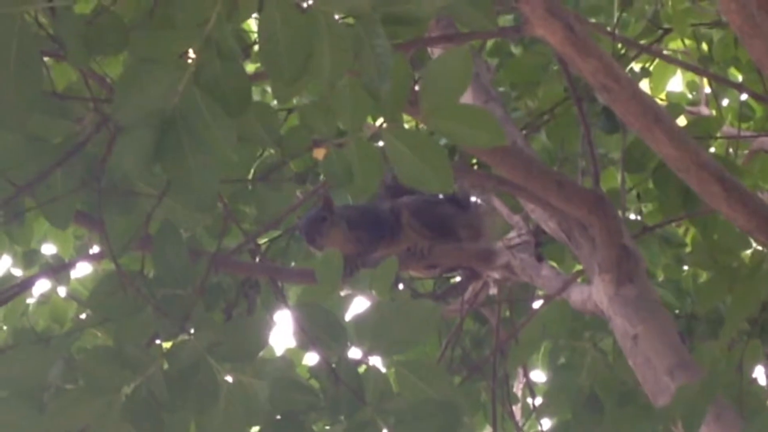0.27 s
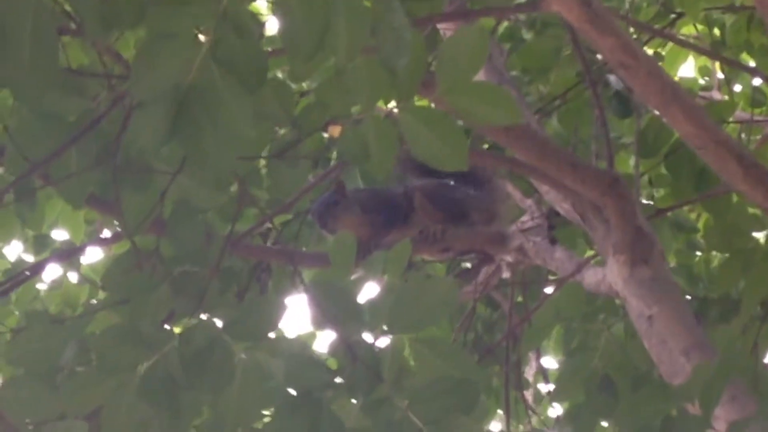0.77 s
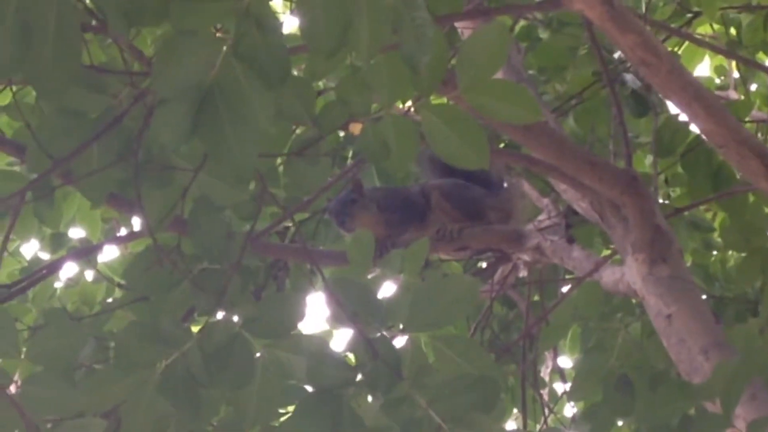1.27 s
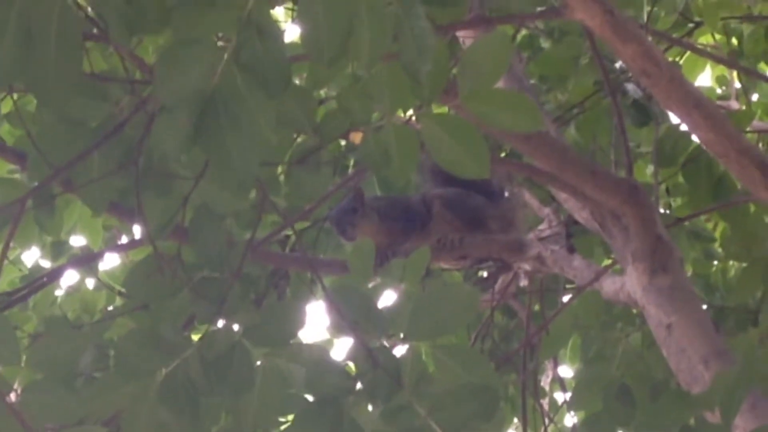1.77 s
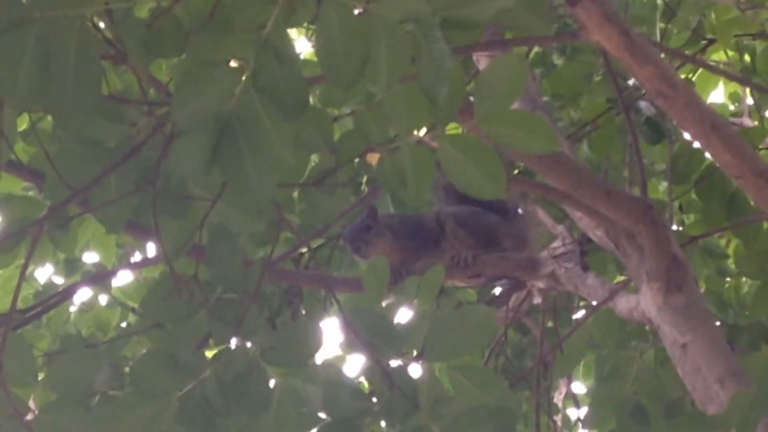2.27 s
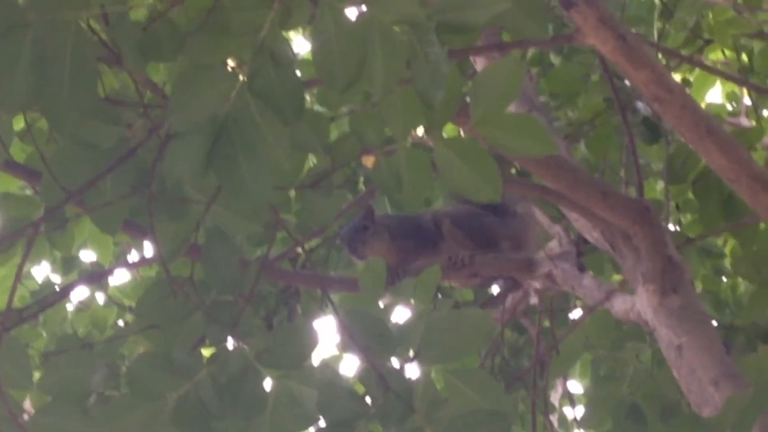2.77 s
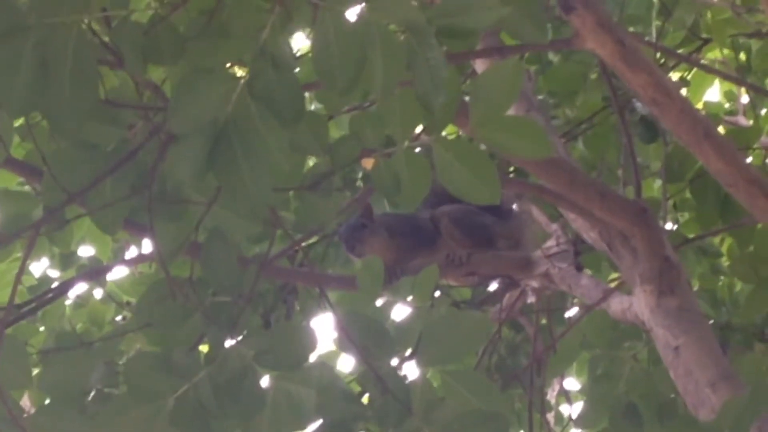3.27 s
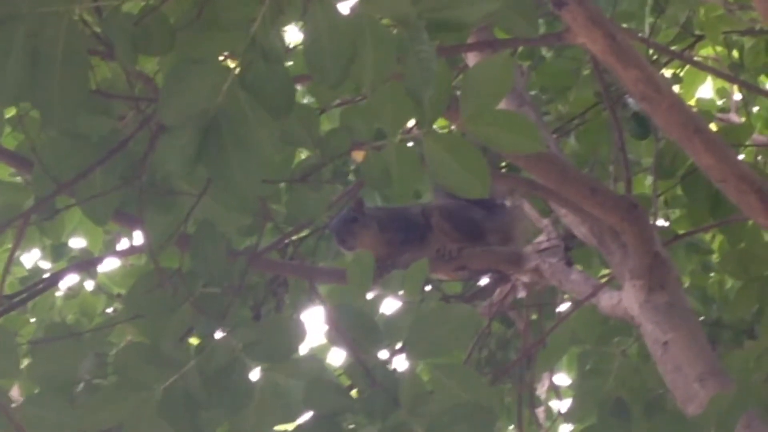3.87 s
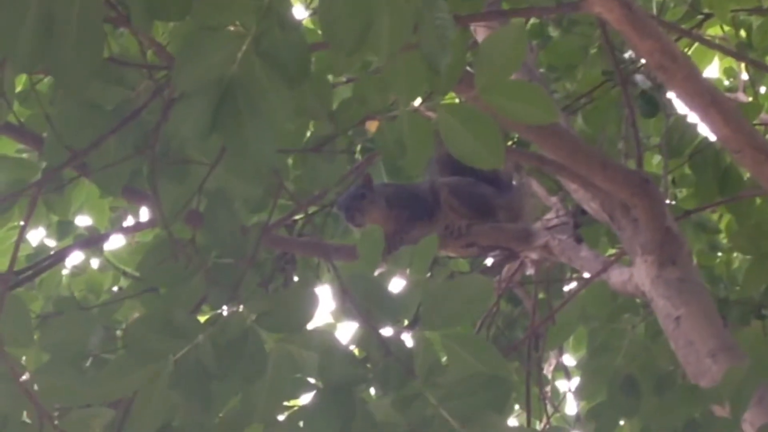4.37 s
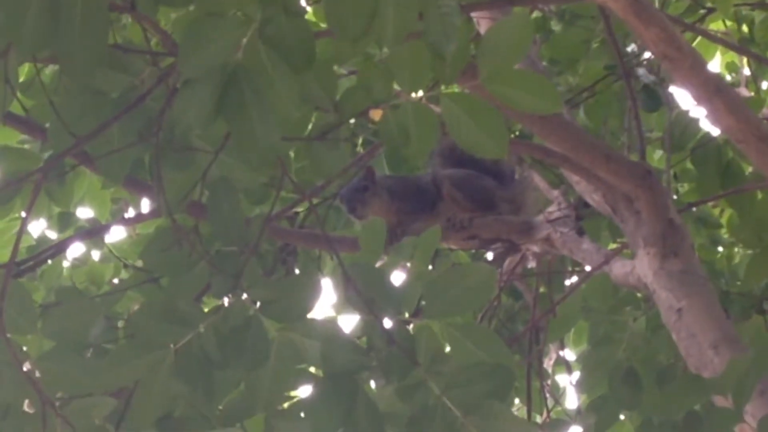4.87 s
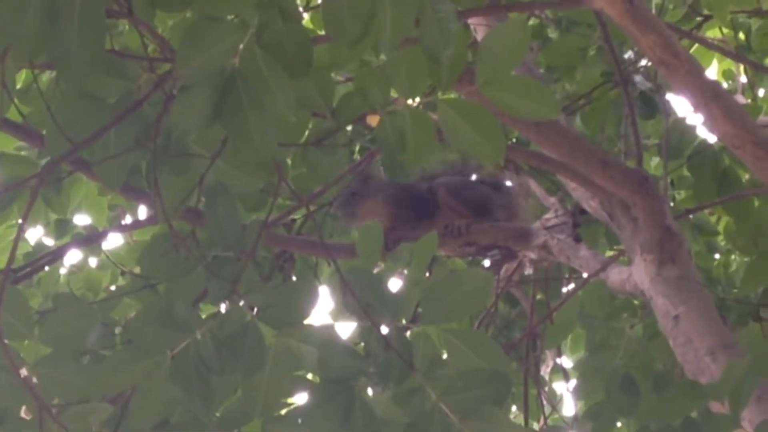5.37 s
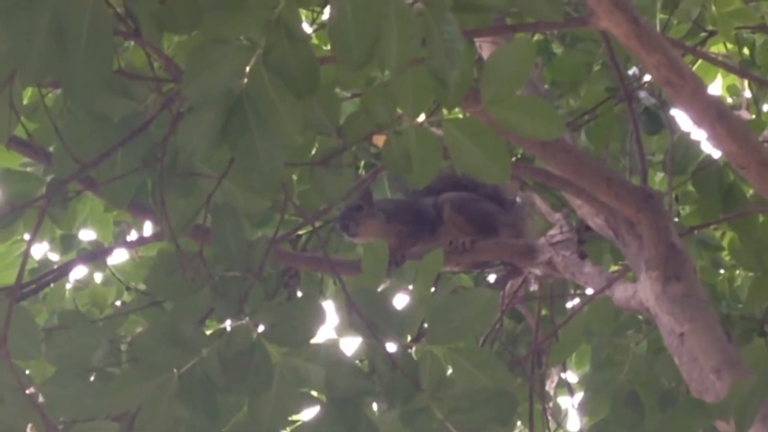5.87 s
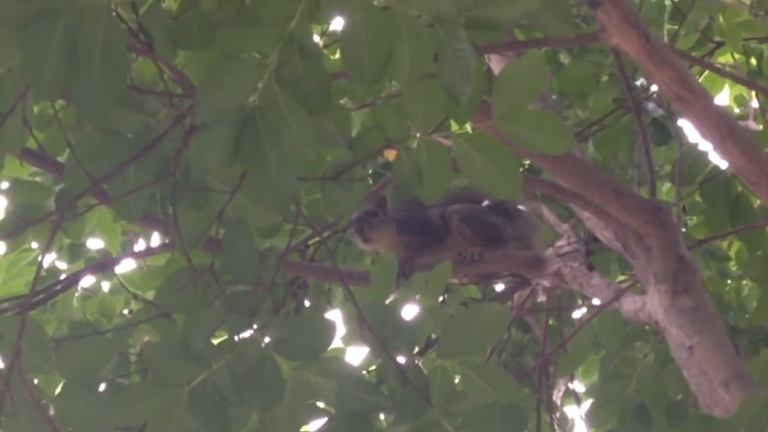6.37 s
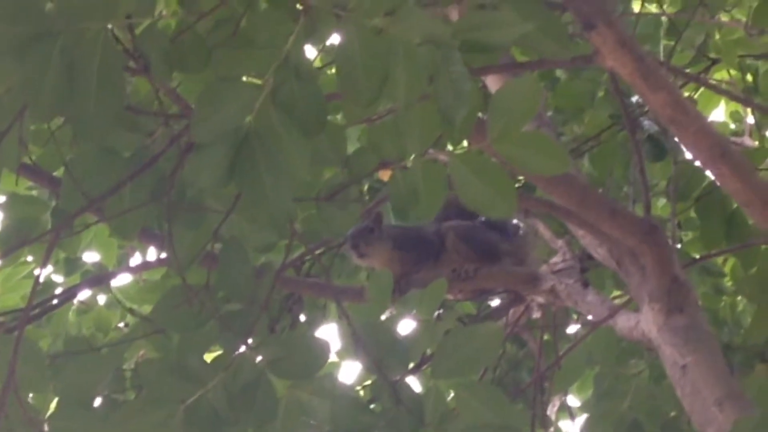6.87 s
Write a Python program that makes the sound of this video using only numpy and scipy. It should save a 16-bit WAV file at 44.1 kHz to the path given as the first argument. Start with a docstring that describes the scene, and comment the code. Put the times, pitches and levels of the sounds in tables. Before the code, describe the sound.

A microphone some way below a tree picks up a squirrel scolding: a fast run of short nasal chucks, a gap holding two distant husky drawn-out rasps, another run of chucks, then a smeared little bird phrase. Three harsh, much louder squeak-and-rasp barks ring out with quick slaps and a diffuse tail, and spaced chucks finish. Faint uneven traffic rumble, engine hum and soft air hiss stay underneath.

```python
"""A squirrel overhead in a tree scolds in runs of short chucks, and in three loud barks.
Each chuck is a sagging, slightly rough tone with breath noise through mouth and nose; each bark is a
squeak that breaks into a rasp of uneven pulses and breath. Farther off a hoarse caller draws out two
rasps built from husky overtones, and a bird gives a few blurred notes. Traffic drones as shaped noise
and unsteady tones; walls and trees answer every call with slaps and a diffuse tail."""
import sys
import numpy as np
from scipy import signal
from scipy.fft import rfft, irfft, next_fast_len
from scipy.io import wavfile
from scipy.ndimage import map_coordinates

SR = 44100
rng = np.random.default_rng(int(sys.argv[2]) if len(sys.argv) > 2 else 0)


def materialize(psi):
    """Save the field psi as 16-bit PCM at rate SR to the path in sys.argv[1].

    A 1-D psi becomes a single channel; in a 2-D psi each row is a channel.
    """
    bounded = np.clip(np.atleast_2d(psi).T, -1, 1)
    quanta = np.round(bounded * 32767).astype(np.int16)
    wavfile.write(sys.argv[1], SR, quanta)


N = 314433  # samples

# Far traffic over time: (time [s], rumble level [dB])
TRAFFIC_LEVELS = [(0, -56.5), (1.1, -57.5), (2.2, -57), (3.0, -57), (4.1, -56.5), (4.95, -59.5), (5.5, -58),
                  (7.13, -56.5)]
# Notes of far engines and machines: (start [s], end [s], pitch [Hz], level [dB])
ENGINE_NOTES = [(-.3, 3.35, 82, -57.5), (-.3, 4.7, 120, -68), (-.3, 0.76, 147, -65), (2.2, 3.1, 98.5, -61),
                (2.9, 3.4, 195.3, -65.5), (3.42, 4, 98.3, -55), (3.901, 4.8, 77.8, -59.5),
                (4.4, 4.75, 98.7, -57.5), (5.2, 5.55, 192, -58), (5.25, 5.65, 100.8, -61.5),
                (5.3, 7.4, 119.1, -68), (6.25, 7.3, 98.5, -60)]
# Colour of the traffic rumble: (frequency [Hz], relative density [dB])
RUMBLE_SPECTRUM = [(13, -53), (22, -18.5), (81, -3.5), (140, -9), (193, -7.5), (231, -13.5), (288, -11),
                   (437, -22.5), (600, -51), (780, -67), (1320, -120)]
# Colour of the steady air hiss: (frequency [Hz], relative density [dB])
AIR_SPECTRUM = [(240, -16.5), (400, -7), (1360, -13.5), (1610, -14.5), (1930, -16.5), (2320, -18),
                (5300, -20.5), (15400, -24)]
AIR_DB = -62
ENGINE_EDGE_S, ENGINE_WANDER_DB = 0.09, 1.5

# Squirrel chucks: (onset [s], length scale [s], mouth noise [dB], nose hiss [dB],
# mouth brightness [dB per octave], pitch mid-hold [Hz], voice [dB], voice held [s])
CHUCK_CALLS = [(-.03, .031, -48.5, -56.5, 0.5, 980, -45, 0.023),
               (0.1097, 0.031, -48.5, -55, 5, 988, -44, 0.024),
               (0.2342, 0.03, -47, -56, 1, 993, -42.5, 0.023),
               (0.38, 0.03, -45, -56.5, -2.2, 968, -45.5, 0.023),
               (0.543, 0.03, -48, -58.5, 0.2, 977, -46.5, 0.022),
               (0.751, 0.029, -46, -55.5, -1.2, 927, -43.5, 0.022),
               (2.659, 0.044, -40.5, -45.5, 4, 1404, -35.5, .046),
               (2.829, .028, -44.5, -53.5, 0.8, 1042, -38.5, 0.023),
               (3.0014, 0.033, -44.5, -53.5, 0, 982, -44, 0.042),
               (3.163, 0.028, -45.5, -54, -.5, 992, -41.5, 0.032),
               (3.3307, 0.032, -46.5, -54.5, 2.5, 968, -41.5, 0.025),
               (3.535, .035, -46, -54, -1, 955, -42, 0.036),
               (3.7455, .032, -47, -54.5, -0.5, 953, -42, 0.026),
               (6.2282, 0.039, -45.5, -53, 2.5, 984, -42, 0.032),
               (6.415, 0.037, -46.5, -54.5, -0.7, 945, -44.5, 0.033),
               (6.6206, 0.035, -45.5, -56, 0.3, 988, -43, 0.022),
               (6.9545, .037, -45, -52, -.5, 1053, -42.5, 0.035)]
# Resonances of the nearly shut mouth, at cavity size 1: (centre [Hz], width [Hz], strength [dB])
SHUT_MOUTH_MODES = [(530, 540, -10), (1025, 233, 2), (1588, 197, -4), (2330, 334, -2.5), (2980, 980, -7),
                    (3655, 323, -2), (4410, 550, -17)]
# Colour of the nose hiss in a chuck: (frequency [Hz], relative density [dB])
CHUCK_NOSE_SPECTRUM = [(2940, -50), (5000, -16), (6960, -9.5), (7470, -6), (7830, 5.5), (8930, -8),
                       (11700, -14), (12700, -8), (15400, -9.5)]
CHUCK_LEAD_S = .009  # air starts this long before the onset
CHUCK_PULSE_HZ = 480  # rate of the pulses in the breath
MOUTH_RISE, NOSE_RISE, VOICE_RISE = 0.49, 0.98, 0.38  # as shares of the chuck's length scale
SLIP_OCT_PER_S = 3.94  # slow pitch fall throughout
SAG_OCT_PER_S, VOICE_FADE_DB_PER_S = 24, 242  # extra fall and fade after the hold
THROAT_HZ, THROAT_DB_PER_OCT = 986, 16.5  # a voice is loudest on this resonance
ROUGH, ROUGH_PER_DB = .34, .06  # noisy share of a chuck's voice, more off the throat resonance

# The hoarse caller's rasps: (start [s], length [s], level [dB], held [s], fade [dB per s],
# brief lift of the 5th harmonic [dB])
RASP_CALLS = [(1.351, 0.67, -53, 0.17, 50, 10.5), (2.01, 0.92, -54, 0.16, 44, 8)]
# Colour of the caller's fixed throat: (frequency [Hz], relative density [dB])
HOARSE_SPECTRUM = [(410, -44), (700, -24), (775, -37), (970, -16), (1280, -8.5), (1490, -1), (1790, -3),
                   (2310, -11), (2630, -27), (3430, -12), (3920, -25), (4810, -21.5), (8000, -24.5),
                   (10400, -60), (17600, -120)]
# Pitch glide before its waver: peaks at the end of the attack, then settles towards the rest pitch
RASP_ATTACK_S, RASP_TOP_HZ, RASP_REST_HZ, RASP_FALL_S = .06, 457.6, 349.7, .11
FOURTH_DB, HANDOVER_S, HANDOVER_WIDTH_S = 3.5, 0.301, 0.048  # 4th harmonic; time it dips under the 5th's lift

# Bird notes: (start [s], end [s], start pitch [Hz], end pitch [Hz], level [dB], blur setting [Hz])
BIRD_NOTES = [(1.91, 2.03, 2950, 2150, -63, 200), (1.9, 2.1, 2400, 2250, -64, 300),
              (1.92, 2.1, 3350, 3300, -70, 250), (1.95, 2.06, 4500, 4450, -75, 200),
              (4.45, 4.5, 1950, 2000, -61, 110), (4.485, 4.59, 2030, 2030, -51.5, 150),
              (4.465, 4.66, 2350, 2650, -55, 250), (4.6, 4.9, 2600, 2100, -66, 2200),
              (4.66, 4.77, 2520, 2450, -64, 150), (4.61, 4.78, 1720, 1700, -58.5, 170),
              (4.78, 4.88, 1600, 1750, -64, 180), (4.66, 4.745, 1250, 1240, -58.5, 50),
              (4.44, 4.56, 2950, 2900, -65, 100), (4.615, 4.7, 3580, 3560, -65, 90),
              (4.705, 4.8, 3580, 3500, -65, 140), (4.825, 4.96, 3085, 3070, -57, 40),
              (4.965, 5.055, 3075, 3065, -70, 45)]
NOTE_EDGES, NOTE_FADE_DB = 0.27, 3  # share of a note spent rising and falling; loss along it

# Squirrel barks: (onset [s], rasp length scale [s], rasp level [dB], nose hiss [dB], noise share [0-1],
# squeak length [s], squeak top pitch [Hz], squeak level [dB], squeak swell [dB])
BARK_CALLS = [(5.162, 0.043, -30.5, -39, 0.91, .038, 1297, -36, 15),
              (5.503, 0.031, -30.5, -44, 0.86, .038, 1113, -38.5, 3),
              (5.8251, 0.028, -33.5, -44, 0.77, .036, 1095, -36.5, 6.5)]
# Resonances of the wide open mouth, at cavity size 1: (centre [Hz], width [Hz], strength [dB])
WIDE_MOUTH_MODES = [(970, 640, -17.5), (1600, 130, -10), (2540, 310, -4.5), (3054, 164, 2), (3460, 370, -4),
                    (4270, 350, -9), (4840, 310, -8.5)]
# Colour of the hiss in a bark: (frequency [Hz], relative density [dB])
BARK_HISS_SPECTRUM = [(3240, -27), (5500, -4), (6070, -10), (7130, -3), (7510, -1), (8510, 0),
                      (10400, -4.5), (15400, -8.5)]
BARK_PULSE_HZ = 456
SQUEAK_START_HZ, SQUEAK_END_HZ, SQUEAK_CLIMB_S, SQUEAK_DROP_S = 400, 900, .0235, .011

# Decay of the diffuse tail: (frequency [Hz], time to fall 60 dB [s])
TAIL_DECAY = [(300, 0.48), (1000, 0.43), (2000, 0.38), (3000, 0.38), (4500, 0.32), (8000, 0.32),
              (13000, 0.19)]
# Slaps off walls: (delay [s], level against the tail [dB])
WALL_SLAPS = [(.041, -4.5), (.062, -27), (.225, -23.5)]
# What leaves and walls send back: (frequency [Hz], relative level [dB])
ECHO_SPECTRUM = [(200, 6.5), (1000, -5.5), (2100, 0.5), (2600, -3), (2950, -4), (3400, -5), (4200, -0.5),
                 (6000, -3.5), (8000, -3.5), (15000, -10.5)]
TOP_HZ = 15450  # band limit of the whole sound


def amp(db):
    """Turn decibels into a linear gain."""
    return 10 ** (np.asarray(db) / 20)


def unit(x):
    """Bring x to rms 1."""
    return x / np.sqrt(np.mean(np.abs(x) ** 2) + 1e-20)


def along(points, hz):
    """Read (Hz, value) points on a log frequency axis."""
    f, v = np.transpose(points)
    return np.interp(np.log(hz + 1), np.log(f + 1), v)


def wobble(rate, size):
    """A smooth random curve, rate knots a second."""
    knots = rng.standard_normal(size // 8)
    return map_coordinates(knots, [np.arange(size) * rate / SR], mode="wrap")


def white_noise(size):
    """Flat hiss of rms about 1."""
    return rng.standard_normal(size)


def coloured(x, spectrum):
    """x through a (Hz, dB) spectrum, brought to rms 1."""
    m = next_fast_len(len(x) + 2048)
    gain = amp(along(spectrum, np.fft.rfftfreq(m, 1 / SR)))
    return unit(irfft(rfft(x, m) * gain, m)[:len(x)])


def hoarse_tone(hz, rough, blur_hz):
    """A tone whose strength and phase partly wander at random."""
    drift = unit(wobble(blur_hz, len(hz)) + 1j * wobble(blur_hz, len(hz)))
    rough = np.clip(rough, 0, 1)
    wander = np.sqrt(1 - rough) + np.sqrt(rough) * drift
    carrier = np.exp(2j * np.pi * np.cumsum(hz) / SR)
    return np.sqrt(2) * np.imag(wander * carrier)


def street():
    """Lumpy low traffic noise, unsteady engine notes and a smooth air hiss."""
    t = np.arange(N) / SR
    rumble_db = np.interp(t, *np.transpose(TRAFFIC_LEVELS)) + 1.7 * wobble(5.114, N) + 1.7 * wobble(14, N)
    rumble = amp(rumble_db) * coloured(white_noise(N), RUMBLE_SPECTRUM)
    air = amp(AIR_DB + 0.2 * wobble(4.05, N)) * coloured(white_noise(N), AIR_SPECTRUM)
    engines = np.zeros(N)
    for start, end, hz, db in ENGINE_NOTES:
        on = (t > start) & (t < end)
        edges = np.clip(np.minimum(t[on] - start, end - t[on]) / ENGINE_EDGE_S, 0, 1)
        level = amp(db + ENGINE_WANDER_DB * wobble(3.7, on.sum()))
        engines[on] += edges * level * hoarse_tone(hz + 0 * edges, 0.28, blur_hz=hz / 9)
    return rumble + air + engines


def add(track, s, sound, wet_db):
    """Lay a sound at time s with slaps off walls and a fresh diffuse tail."""
    hz, t, z = signal.stft(white_noise(SR // 2), SR, nperseg=256)
    decay = amp(-60 * t / along(TAIL_DECAY, hz)[:, None])
    tail = signal.istft(z * decay, SR, nperseg=256)[1]
    space = np.pad(tail / np.linalg.norm(tail), (round(.008 * SR), 0))
    for delay, db in WALL_SLAPS:
        space[round(delay * SR)] += amp(db)
    space = amp(wet_db) * coloured(space, ECHO_SPECTRUM) / np.sqrt(len(space))
    space[0] = 1  # the direct sound
    heard = signal.fftconvolve(sound, space)
    at = SR + round(s * SR)  # the track has a second of lead-in
    track[at:at + len(heard)] += heard


def glottis(hz, jitter, share):
    """Uneven pulses at a rate, mixed with breath noise that puffs once a cycle."""
    turns = np.cumsum(hz * (1 + jitter * wobble(300, len(hz)))) / SR
    pulses = np.diff(np.floor(turns), prepend=0) * amp(1.5 * rng.standard_normal(len(hz)))
    puffs = (2.4 + np.cos(2 * np.pi * turns)) * white_noise(len(hz))
    share = np.clip(share, 0, 1)
    return np.sqrt(1 - share) * unit(pulses) + np.sqrt(share) * unit(puffs)


def puff(t, rise, length):
    """Breath pressure: a quick rise, a rounded top, a fade."""
    return np.sin(np.clip(t / rise, 0, 1) * np.pi / 2) * np.exp(-np.abs(t / length) ** 4.4)


def resonant(x, modes, size):
    """x rung through resonances that drop as the cavity grows, brought to rms 1."""
    m = next_fast_len(len(x) + 2048)
    f = np.fft.rfftfreq(m, 1 / SR) * size
    tract = 0
    for k, (centre, width, db) in enumerate(modes):
        ring = 1j * f * width / (centre * centre - f * f + 1j * f * width)
        tract = tract + (-1) ** k * amp(db) * ring  # neighbours alternate in polarity
    rolloff = 1 + (f / (1.04 * modes[-1][0])) ** 12  # little passes above the last resonance
    return unit(irfft(rfft(x, m) * tract / rolloff, m)[:len(x)])


def opening(x, modes, t, start_size, size, travel):
    """Resonances climb while the jaw moves: a blend from one cavity size to another."""
    turn = np.clip(t / travel, 0, 1) * np.pi / 2
    return np.cos(turn) * resonant(x, modes, start_size) + np.sin(turn) * resonant(x, modes, size)


def throat_db(hz):
    """Loss of a voice that sings off the throat resonance."""
    return -THROAT_DB_PER_OCT * np.abs(np.log2(hz / THROAT_HZ))


def chucks(track):
    """The folds lock onto the throat near 1 kHz and sag; breath noise runs through mouth and nose."""
    t = np.arange(SR // 5) / SR
    for s, length, mouth_db, nose_db, tilt_db, hz, voice_db, held in CHUCK_CALLS:
        late = np.clip(t - held, 0, None)
        pitch = hz * 2 ** (-SLIP_OCT_PER_S * (t - held / 2) - SAG_OCT_PER_S * late)
        tone = hoarse_tone(pitch, ROUGH - ROUGH_PER_DB * throat_db(pitch), blur_hz=300)
        tone += amp(-14) * hoarse_tone(pitch / 2, 0.92, blur_hz=307.0)  # every other cycle is weaker
        rise = np.clip(t / (VOICE_RISE * length), 0, 1) ** 1.16
        effort = rise * amp(throat_db(pitch) - VOICE_FADE_DB_PER_S * late)
        voice = amp(voice_db) * effort * tone

        jaw = 1 + .02 * rng.standard_normal()  # each chuck is shaped a little differently
        modes = [(c, width, db + tilt_db * np.log2(c / 2000) + rng.normal(0, 1.5))
                 for c, width, db in SHUT_MOUTH_MODES]
        source = glottis(CHUCK_PULSE_HZ + 0 * t, .2, 0.84)
        breath = opening(source, modes, t, 1.168 * jaw, 1.013 * jaw, 0.69 * length)
        flutter = amp(1.23 * wobble(120, len(t)))  # the airflow is uneven
        mouth = amp(mouth_db) * puff(t - .002, MOUTH_RISE * length, 1.51 * length) * flutter * breath
        nose_puff = puff(t - .002, NOSE_RISE * length, 1.58 * length)
        nose = amp(nose_db) * nose_puff * coloured(white_noise(len(t)), CHUCK_NOSE_SPECTRUM)
        add(track, s - CHUCK_LEAD_S, voice + mouth + nose, wet_db=-10)


def rasps(track):
    """A falling, wavering stack of husky overtones with breath, through a fixed throat, far away."""
    for s, length, db, held, fade_db, lift_db in RASP_CALLS:
        t = np.arange(0, length, 1 / SR)
        bend = np.exp(-((t - RASP_ATTACK_S) / RASP_FALL_S) ** 2)
        glide = RASP_REST_HZ + (RASP_TOP_HZ - RASP_REST_HZ) * bend
        hz = glide * (1 + .015 * wobble(22, len(t)))
        # the voice tips briefly into a higher strand
        handover = np.exp(-((t - HANDOVER_S) / HANDOVER_WIDTH_S) ** 2)
        weight_db = {4: FOURTH_DB - 0.26 * lift_db * handover, 5: lift_db * handover}
        stack = np.zeros(len(t))
        for k in range(3, 16):
            strength = amp(weight_db.get(k, 0) + 2 * wobble(14, len(t)))
            stack += strength * hoarse_tone(k * hz, .72, blur_hz=48 * k)
        husky = unit(stack) + amp(1.2) * white_noise(len(t))
        fade = amp(db - fade_db * np.clip(t - RASP_ATTACK_S - held, 0, None))
        effort = np.sqrt(np.clip(t / RASP_ATTACK_S, 0, 1)) * fade
        shape = effort * signal.windows.tukey(len(t), .08)
        add(track, s, shape * coloured(husky, HOARSE_SPECTRUM), wet_db=-7.0)


def bird(track):
    """Short husky gliding notes, smeared by distance and leaves."""
    for s, end, hz, end_hz, db, blur in BIRD_NOTES:
        pitch = np.linspace(hz, end_hz, round((end - s) * SR))
        fade_db = np.linspace(0, -NOTE_FADE_DB, len(pitch))
        shape = signal.windows.tukey(len(pitch), NOTE_EDGES) * amp(fade_db + 1.2 * wobble(43, len(pitch)))
        note = hoarse_tone(pitch, blur / 120, blur_hz=2 * blur + 90)
        add(track, s, amp(db) * shape * note, wet_db=-9.0)


def bark_squeak(lead, top_hz, squeak_db, swell_db):
    """A clean squeak behind shut lips climbs and drops back while a little air leaks."""
    t = np.arange(0, lead, 1 / SR)
    climb = np.sin(np.clip(t / SQUEAK_CLIMB_S, 0, 1) * np.pi / 2) ** 2
    drop_times = [SQUEAK_CLIMB_S, SQUEAK_CLIMB_S + SQUEAK_DROP_S]
    drop = np.interp(t, drop_times, [0, SQUEAK_END_HZ - top_hz])
    pitch = SQUEAK_START_HZ + (top_hz - SQUEAK_START_HZ) * climb + drop
    # a slow start carries its overtone into the throat resonance
    low = np.clip(1.6 - pitch / 560, 0, 1.2)
    tone = hoarse_tone(pitch, .12, blur_hz=301) + low * hoarse_tone(2 * pitch, .4, blur_hz=500)
    leak = amp(-61.5) * resonant(white_noise(len(t)), WIDE_MOUTH_MODES, size=.8)
    leak += amp(-62.5) * coloured(white_noise(len(t)), BARK_HISS_SPECTRUM)
    effort_db = squeak_db - swell_db * (1 - t / lead) + .5 * throat_db(pitch)
    return signal.windows.tukey(len(t), .15) * (amp(effort_db) * tone + leak)


def bark_rasp(length, db, nose_db, share):
    """The mouth opens on a burst of rough pulses and breath, with hiss from the nose."""
    t = np.arange(SR // 5) / SR
    source = glottis(BARK_PULSE_HZ + 0 * t, 0.052, share)
    rasp = opening(source, WIDE_MOUTH_MODES, t - .004, 1.76, 1, 0.0068)
    mouth = amp(db) * puff(t - .002, 0.018, length) * rasp
    hiss = coloured(white_noise(len(t)), BARK_HISS_SPECTRUM)
    return mouth + amp(nose_db) * puff(t, 0.016, 1.29 * length) * hiss


def barks(track):
    """Each squeak runs up to the onset and overlaps the start of its rasp."""
    for s, length, db, nose_db, share, lead, top_hz, squeak_db, swell_db in BARK_CALLS:
        add(track, s + .002 - lead, bark_squeak(lead, top_hz, squeak_db, swell_db), wet_db=-9.5)
        add(track, s - .009, bark_rasp(length, db, nose_db, share), wet_db=-8.5)


def scene():
    """Calls with their echoes over the street, with room for early starts and late tails."""
    track = np.zeros(N + 3 * SR)
    chucks(track)
    rasps(track)
    bird(track)
    barks(track)
    return (track[SR:SR + N] + street())[None]


def record(dry):
    """Nothing passes above the band limit."""
    m = next_fast_len(N + 8192)
    below_limit = np.fft.rfftfreq(m, 1 / SR) < TOP_HZ
    return irfft(rfft(dry, m) * below_limit, m)[:, :N]


dry = scene()
out = record(dry)
materialize(out)
```